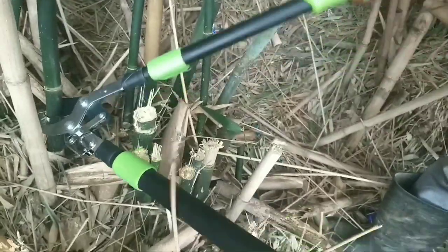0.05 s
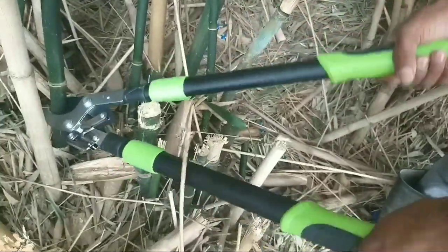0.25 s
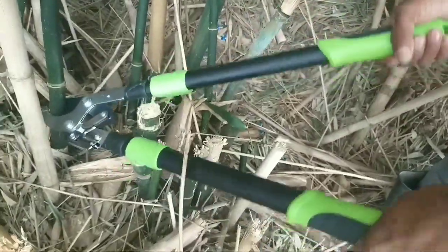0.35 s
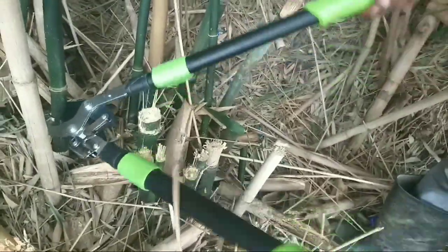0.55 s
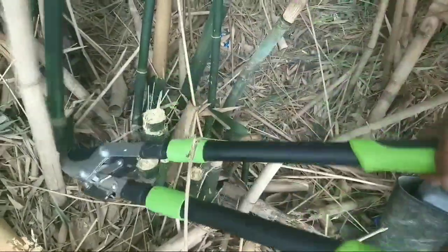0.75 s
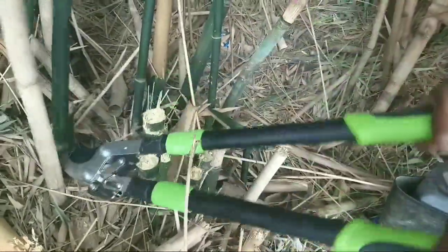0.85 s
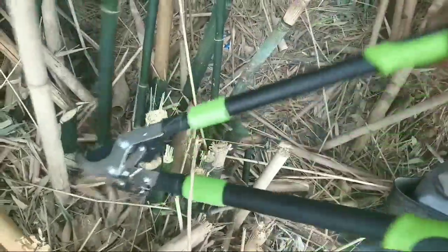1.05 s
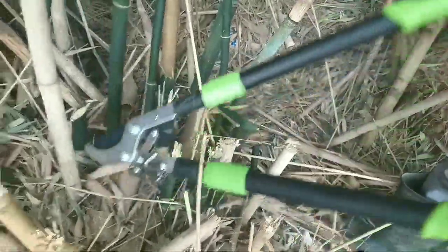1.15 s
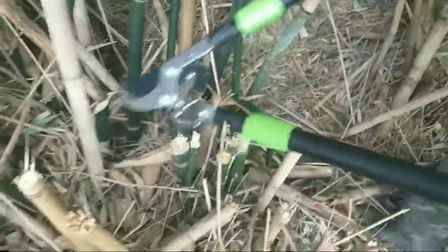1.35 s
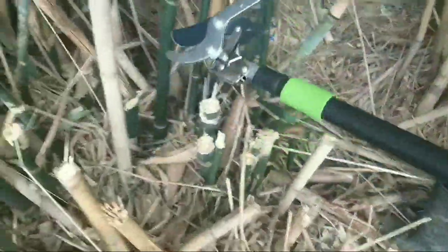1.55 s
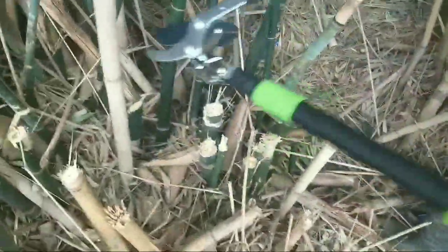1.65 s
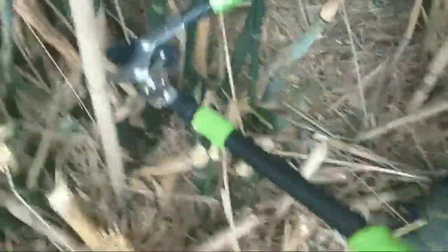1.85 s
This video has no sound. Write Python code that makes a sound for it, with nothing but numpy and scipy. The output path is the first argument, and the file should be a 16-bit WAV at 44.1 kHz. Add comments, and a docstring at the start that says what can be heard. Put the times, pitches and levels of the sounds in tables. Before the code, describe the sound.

Close up and outdoors, green bamboo splits twice under loppers, each crunch carrying a hollow knock. A sharp metal clack follows, then a small tick, with light twig snaps and dry leaf rustle fading around them.

```python
"""Loppers cutting green bamboo.

Long-handled loppers bite twice through a stem, close by, outdoors. Each bite is a quick run of
splitting fibres over the hollow stem's knock; the blade squeaks in the second, then the tool clacks
and ticks free. Twigs snap and dry leaves rustle as the stem shifts. The grove scatters each crack,
and a faint hum and a soft rumble lie behind."""
import sys
import numpy as np
from scipy import signal
from scipy.fft import rfft, irfft, next_fast_len
from scipy.io import wavfile
from scipy.ndimage import uniform_filter1d, map_coordinates

SR = 44100
rng = np.random.default_rng(int(sys.argv[2]) if len(sys.argv) > 2 else 0)


def unload_wav(signal):
    """Save mono or channel-first audio to the path in sys.argv[1] as 16-bit WAV at rate SR, clipped to [-1, 1]."""
    wavfile.write(
        sys.argv[1],
        SR,
        np.round(np.clip(np.atleast_2d(signal).T, -1, 1) * 32767).astype(np.int16),
    )


N = 83790
TIME_S = np.arange(N) / SR

# fibre crack spectrum: f/Hz, level/dB
FIBRE_SPECTRUM = [(200, -10), (900, -23.5), (1800, -5), (2500, -4), (3400, -3), (4600, -1.5), (6200, -2.5),
                  (8000, -3), (15000, -8.5)]
# stem wall resonances: f/Hz, width/Hz, gain/dB
WALL_MODES = [(1750, 180, 1.6), (3380, 160, 4), (3800, 370, 5), (4530, 130, 1), (6100, 93, 4),
              (6320, 93, 4.5)]
# hollow stem spectrum: f/Hz, level/dB
STEM_SPECTRUM = [(60, -40.5), (200, 2), (420, -2.5), (540, 10), (700, 4), (820, -2), (1100, 2), (1700, -2),
                 (3500, 0), (9000, -46.5)]
# fibre bundles splitting: t/s, level/dB, t60/s, tilt/(dB/oct), stem level/dB, splinter f/Hz
FIBRE_SPLITS = [(0.1871, -28, 0.023, 0.5, -37.5, 6350), (0.2017, -8.5, 0.0015, 0, -27.5, 3440),
                (0.2039, -19, 0.0033, -0.5, -44.5, 6300), (0.2123, -9, 0.0065, 1.5, -23, 6400),
                (0.2138, -14.5, 0.024, -1, -38.5, 3170), (0.2187, -14.5, 0.0087, -0.5, -30, 3450),
                (0.224, -18, 0.023, -0.5, -23, 3150), (.2265, -19, 0.016, 10, -26.5, 4000),
                (0.2353, -17, 0.0079, 1.5, -21, 5830), (0.2414, -20.5, 0.0071, 2, -43, 6400),
                (0.6784, -14, 0.016, -2, -31, 5900), (.6875, -21, 0.057, 0, -32.5, 3540),
                (0.6906, -16.5, 0.011, -7, -33.5, 1650), (0.6972, -4, 0.0093, 8.5, -29, 6080),
                (.7070, -26, 0.013, -9.5, -31, 1940), (.7130, -12.5, .005, 0, -38, 4550)]

def splits():
    """Each bundle cracks through the stem wall, rings its splinter and knocks the hollow stem."""
    out = np.zeros(N)
    wall_db = lambda hz: sum(db / (1 + (2 * (hz - f) / width) ** 2) for f, width, db in WALL_MODES)
    for s, db, t60, tilt, stem_db, splinter_hz in FIBRE_SPLITS:
        splinter_db = lambda hz: 6.5 * bump(hz, splinter_hz, width_oct=0.094) + tilt * treble_oct(hz)
        crack_db = lambda hz: curve(FIBRE_SPECTRUM)(hz) + wall_db(hz) + splinter_db(hz)
        add(out, s, amp(db) * burst(t60, crack_db, rise_s=0.00027, hold_s=0.0015))
        add(out, s, amp(stem_db) * burst(t60=0.049, db_of=curve(STEM_SPECTRUM)))
    return out


# tearing spans: start t/s, end t/s, level/dB
FIBRE_TEARS = [(0.207, 0.241, -29), (0.678, 0.7, -26)]

def tears(rise_s=0.0013, t60_s=0.05):
    """Fibres tear between the splits in a dense crackle."""
    out = np.zeros(N)
    for start, end, db in FIBRE_TEARS:
        attack = np.clip((TIME_S - start) / rise_s, 0, 1)
        release = amp(-60 * np.maximum(TIME_S - end, 0) / t60_s)
        out += amp(db) * attack * release * coloured(crackle(per_s=1500), curve(FIBRE_SPECTRUM))
    return out


# jolt spectrum: f/Hz, level/dB
JOLT_SPECTRUM = [(25, 26.5), (70, -5), (130, 8.5), (280, -14.5), (500, -38.5), (2000, -57)]
# jolts: t/s, level/dB
ARM_JOLTS = [(.224, -28), (0.698, -25), (0.744, -46.5), (.795, -53.5)]

def jolts():
    """A low jolt runs through the arms as the stem gives way."""
    out = np.zeros(N)
    for s, db in ARM_JOLTS:
        add(out, s, amp(db) * burst(t60=0.06, db_of=curve(JOLT_SPECTRUM)))
    return out


def squeak(start_s=0.6829, end_s=0.72, from_hz=1942, to_hz=1624.5, level_db=-32, octave_db=5.5):
    """The blade wedges through wet fibre: a brief, rough, falling note and its octave."""
    progress = np.clip((TIME_S - start_s) / (end_s - start_s), 0, 1)
    pitch_hz = (from_hz + (to_hz - from_hz) * progress) * (1 + 0.04 * wobble(900))
    phase = 2 * np.pi * np.cumsum(pitch_hz) / SR
    envelope = np.sqrt(np.abs(np.sin(np.pi * progress)))
    return amp(level_db) * envelope * (np.sin(phase) + amp(octave_db) * np.sin(2 * phase))


# steel impact spectrum: f/Hz, level/dB
STEEL_SPECTRUM = [(200, -39.5), (900, -18.5), (2000, -12), (2550, -3), (3300, -1.5), (4400, 3.5),
                  (5200, -2.5), (6300, -4), (8300, -1), (12000, 1.5), (14500, 0)]
# jaw modes: f/Hz, level/dB re clack, t60/s
JAW_MODES = [(2703, -10.5, 0.022), (3260, -8.5, 0.026), (3900, -11, 0.018), (4100, -35.5, .018),
             (5160, -17, 0.03), (6010, -48, 0.044)]
# pivot link modes: f/Hz, level/dB re click, t60/s
LINK_MODES = [(2734, -9.5, 0.023), (3690, -2, 0.025), (4360, -17, 0.036), (4660, -17, 0.024),
              (4910, -5.5, 0.036), (6730, -11.5, 0.045)]
# jaw clack and link click: t/s, level/dB, t60/s
JAW_CLACK = (1.0546, -11, 0.017)
LINK_CLICK = (1.6945, -32.5, 0.023)

def jaws():
    """The jaws clack free and the link clicks: a dry crack and a damped steel ring each."""
    out = np.zeros(N)
    for (s, db, t60), modes in ((JAW_CLACK, JAW_MODES), (LINK_CLICK, LINK_MODES)):
        add(out, s, amp(db) * burst(t60, curve(STEEL_SPECTRUM), rise_s=0.00011, hold_s=0.0011))
        add(out, s, amp(db) * steel_ring(modes))
    return out


def steel_ring(modes, rise_s=0.00046):
    """Struck steel rings in dying sines, each slightly random in level."""
    t = np.arange(12000) / SR
    ring = np.zeros_like(t)
    for hz, db, t60 in modes:
        envelope = amp(db + rng.normal(0, 1.6) - 60 * t / t60)
        ring += envelope * np.sin(2 * np.pi * (hz * t + rng.random()))
    return ring * (1 - np.exp(-(t / rise_s) ** 2))


# twig snap spectrum: f/Hz, level/dB
TWIG_SPECTRUM = [(200, -26.5), (900, -19), (2000, -5), (4000, -3.5), (7500, -4), (9500, -4.5), (15000, -18)]
# snaps: t/s, level/dB, t60/s, tilt/(dB/oct), resonance f/Hz
TWIG_SNAPS = [(0.0374, -32, 0.039, -2.5, 5440), (0.1424, -32.5, 0.036, 3, 5540),
              (0.157, -44.5, 0.066, -5, 6050), (0.172, -29.5, 0.0038, -2, 3180),
              (0.1833, -36, 0.045, -11, 2050), (0.27, -25.5, 0.039, 14.5, 6160),
              (0.2955, -49, 0.012, -4, 3400), (0.527, -47.5, 0.059, -2, 5900),
              (0.63, -39, 0.041, -0.5, 2380), (0.6718, -35, 0.05, -9, 3850),
              (0.885, -40.5, 0.051, 4.5, 7700), (0.925, -40, 0.058, 5.5, 5840),
              (1.1395, -33, 0.032, 6, 5500), (1.2068, -44.5, 0.0091, 6, 6000),
              (1.399, -53.5, 0.035, 14, 7360), (1.465, -56, 0.024, -3.5, 5500),
              (1.5281, -50.5, 0.023, -1.5, 5840), (1.582, -41.5, 0.034, 2, 8000),
              (1.61, -51, 0.02, 8.5, 7700)]

def twigs():
    """Fibres and twigs snap, each with a short resonance of its own."""
    out = np.zeros(N)
    for s, db, t60, tilt, pitch_hz in TWIG_SNAPS:
        own_db = lambda hz: 7.5 * bump(hz, pitch_hz, width_oct=0.2) + tilt * treble_oct(hz)
        add(out, s, amp(db) * burst(t60, lambda hz: curve(TWIG_SPECTRUM)(hz) + own_db(hz)))
    return out


# stem on stem: t/s, level/dB, f/Hz, t60/s, body level/dB, body f/Hz
STEM_KNOCKS = [(.345, -37, 1940, 0.15, -60, 560), (.4752, -41.5, 1625, 0.035, -67, 554),
               (0.7351, -37, 1040, 0.089, -41.5, 450), (0.8229, -36, 910, 0.032, -42.5, 513),
               (0.8529, -29.5, 1500, 0.012, -40.5, 340), (0.887, -42, 900, 0.038, -50, 460),
               (1.0909, -31.5, 1810, 0.027, -46.5, 590)]

def knocks(body_db_per_oct=-23, knock_db_per_oct=-8):
    """Stems knock together dully, with a hollow note below."""
    out = np.zeros(N)
    for s, db, pitch_hz, t60, body_db, body_hz in STEM_KNOCKS:
        hollow_db = lambda hz: body_db_per_oct * np.abs(np.log2(hz / body_hz))
        add(out, s, amp(body_db) * burst(t60=0.055, db_of=hollow_db))
        peak_db = lambda hz: 5 * bump(hz, pitch_hz, width_oct=0.15)
        skirt_db = lambda hz: knock_db_per_oct * np.abs(np.log2(hz / pitch_hz))
        add(out, s, amp(db) * burst(t60, lambda hz: peak_db(hz) + skirt_db(hz)))
    return out


# dry leaf spectrum: f/Hz, level/dB
LEAF_SPECTRUM = [(100, -31), (400, -9.5), (600, -0.5), (1000, -4.5), (2000, 4.5), (3000, -2.5), (5000, 2),
                 (6300, -2.5), (8000, 0.5), (15000, 0)]
# rustle envelope: t/s, level/dB
RUSTLE_LEVELS = [(0, -52.5), (0.132, -57), (0.202, -36), (.3, -42.5), (.37, -52.5), (.45, -54.5), (.6, -65),
                 (.67, -53.5), (.73, -41.5), (.8, -42.5), (.84, -45), (0.972, -40), (1.01, -47.5),
                 (1.07, -48), (1.139, -41.5), (1.188, -53), (1.27, -54), (1.34, -59), (1.4, -58.5),
                 (1.5, -67), (1.81, -75), (1.855, -57.5), (1.9, -75)]

def leaves(hiss_db=0.5, crinkle_db=-8.5):
    """Dry leaves crinkle and brush as the stem shifts."""
    level_db = np.interp(TIME_S, *np.transpose(RUSTLE_LEVELS)) + 1.5 * wobble(65)
    brushing = unit(crackle(per_s=2800) + amp(hiss_db) * rng.standard_normal(N))
    grain = brushing + amp(crinkle_db) * crinkles()
    return coloured(amp(level_db) * grain, curve(LEAF_SPECTRUM))


def crinkles(per_s=380, centre_hz=4530, t60_s=0.014):
    """Separate little buckles of dry leaf, each at its own pitch, rms 1."""
    out, t = np.zeros(N), np.arange(1024) / SR
    for when, strength, colour in rng.random((int(per_s * N / SR), 3)):
        pitch_hz = centre_hz * 2 ** (0.63 * np.tan(2 * colour - 1))  # within an octave either way
        puff = rng.standard_normal(len(t)) * amp(-60 * t / t60_s)
        buckle = coloured(puff, lambda hz: 20 * bump(hz, pitch_hz, width_oct=0.45))
        add(out, when * (N - 1) / SR, strength * buckle)
    return unit(out)


# grove decay: f/Hz, t60/s
GROVE_DECAY = [(200, 0.18), (1500, 0.72), (3200, 0.36), (6000, 0.21), (14000, 0.24)]

def grove(x, level_db=-18, delay_s=0.0043, blur_hz=129):
    """Surrounding stems scatter the sound into a short, diffuse tail, smeared in pitch."""
    hz, t, noise = signal.stft(rng.standard_normal(SR // 2), SR, nperseg=256)
    decay = amp(-60 * t / curve(GROVE_DECAY)(hz)[:, None])
    tail = signal.istft(noise * decay, SR, nperseg=256)[1]
    delayed = np.pad(x, (round(delay_s * SR), 0))
    echo = signal.fftconvolve(delayed, tail / np.linalg.norm(tail))[:N]
    drift_cycles = np.cumsum(blur_hz * wobble(300)) / SR
    return amp(level_db) * np.real(signal.hilbert(echo) * np.exp(2j * np.pi * drift_cycles))


# rumble spectrum: f/Hz, level/dB
RUMBLE_SPECTRUM = [(30, -16.5), (70, -6.5), (150, -5.5), (260, -7), (400, -20.5), (1500, -29.5)]
# rumble envelope: t/s, level/dB
RUMBLE_LEVELS = [(0, -51.5), (.28, -47.5), (0.421, -59), (.6, -65.5), (.8, -50.5), (1.0, -64.5), (1.9, -69)]

def rumble():
    """A soft low rumble swells and fades around each bite."""
    level_db = np.interp(TIME_S, *np.transpose(RUMBLE_LEVELS))
    return amp(level_db) * coloured(rng.standard_normal(N), curve(RUMBLE_SPECTRUM))


# hum partials: f/Hz, rms level/dB
HUM_PARTIALS = [(75.4, -67.5), (149, -70), (239.5, -72)]

def hum():
    """A faint low hum, wavering slightly in level and phase."""
    out = np.zeros(N)
    for hz, db in HUM_PARTIALS:
        envelope = np.sqrt(2) * amp(db + 0.8 * wobble(4))
        out += envelope * np.sin(2 * np.pi * hz * TIME_S + 0.2 * wobble(5))
    return out


# outdoor air spectrum: f/Hz, level/dB
AIR_SPECTRUM = [(25, -36.5), (65, -2), (100, -3.5), (160, 4.5), (270, 9), (380, -8.5), (600, -5.5),
                (1200, -14), (2000, -8), (3500, -16.5), (15000, -33.5)]

def air(level_db=-64.5):
    """Quiet outdoor air: steady, dark noise."""
    return amp(level_db) * coloured(rng.standard_normal(N), curve(AIR_SPECTRUM))


def amp(db):
    """Decibels to gain."""
    return 10 ** (np.asarray(db) / 20)


def unit(x):
    """Scale to rms 1."""
    return x / np.sqrt(np.mean(x ** 2) + 1e-20)


def curve(points):
    """The function of frequency through (f/Hz, value) points on a log axis."""
    f, values = np.transpose(points)
    return lambda hz: np.interp(np.log(hz + 1), np.log(f + 1), values)


def bump(hz, pitch_hz, width_oct):
    """A bell of height 1 around a pitch."""
    return np.exp(-(np.log2(hz / pitch_hz) / width_oct) ** 2)


def treble_oct(hz):
    """Octaves above 1 kHz, zero below."""
    return np.log2(np.maximum(hz, 1000) / 1000)


def wobble(per_s):
    """A smooth curve through random knots."""
    return map_coordinates(rng.standard_normal(int(N * per_s / SR) + 4), [TIME_S * per_s])


def crackle(per_s):
    """Tiny impulses of random size, rms 1."""
    return unit((rng.random(N) < per_s / SR) * rng.standard_normal(N))


def coloured(x, db_of, keep_power=True):
    """Minimum-phase filter with a gain of db_of(hz), scaled to rms 1 if keep_power."""
    m = 2 * next_fast_len(len(x))
    gain = amp(db_of(np.fft.rfftfreq(m, 1 / SR) + 1))
    cepstrum = irfft(np.log((unit(gain) if keep_power else gain) + 1e-6))
    cepstrum[1:m // 2] *= 2
    cepstrum[m // 2 + 1:] = 0
    return irfft(rfft(x, m) * np.exp(rfft(cepstrum)), m)[:len(x)]


def burst(t60, db_of, rise_s=0, hold_s=0, size=8192):
    """A sharp, dying puff of noise, evened out in frequency and then coloured."""
    t = np.arange(size) / SR
    attack = np.minimum((t + 1 / SR) / (rise_s + 1 / SR), 1)
    envelope = attack * amp(-60 * np.maximum(t - hold_s, 0) / t60)
    puff = rng.standard_normal(size) * envelope
    power = np.abs(uniform_filter1d(np.abs(rfft(puff)) ** 2, size=64)) + 1e-9
    even = coloured(puff, lambda hz: np.interp(hz, np.fft.rfftfreq(size, 1 / SR), -10 * np.log10(power)))
    return coloured(even * np.linalg.norm(envelope) / np.linalg.norm(even), db_of)


def add(track, s, x):
    """Mix x into the track at s seconds."""
    i = max(round(s * SR), 0)
    track[i:i + len(x)] += x[:N - i]


# stereo width: f/Hz, side level/dB re mid
SIDE_GAIN = [(300, -54.5), (600, -53), (1300, -19.5), (2300, -11.5), (4000, -44.5), (8000, -38.5),
             (14000, -48)]

def scene():
    """Everything is near the centre, with a little width in the midrange."""
    near = splits() + tears() + jolts() + squeak() + jaws() + twigs() + knocks()
    mid = near + grove(near) + leaves() + hum() + air() + rumble()
    side = coloured(mid, curve(SIDE_GAIN), keep_power=False)
    return np.array([mid + side, mid - side])


# microphone response: f/Hz, gain/dB
MIC_RESPONSE = [(20, -32), (55, -3), (1000, 1), (4900, 1), (6400, 7), (7500, 0.5), (8500, -8.5),
                (9800, -21), (11800, -7.5), (15300, -8.5), (15900, -21.5)]
CEILING, LOW_CUT_HZ, TOP_HZ = 0.9, 45, 15900

def record(dry):
    """A small microphone with a treble peak, rounded overload, a low cut and a band limit."""
    x = np.array([coloured(channel, curve(MIC_RESPONSE), keep_power=False) for channel in dry])
    x = x / (1 + np.abs(x / CEILING) ** 6) ** (1 / 6)
    x = signal.sosfilt(signal.butter(2, LOW_CUT_HZ, "high", fs=SR, output="sos"), x)
    m = next_fast_len(N + SR // 2)
    passband = np.fft.rfftfreq(m, 1 / SR) < TOP_HZ
    return irfft(rfft(x, m) * passband, m)[:, :N]


dry = scene()
out = record(dry)
unload_wav(out)
```